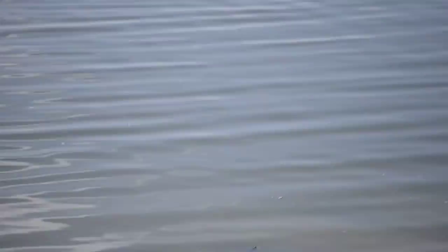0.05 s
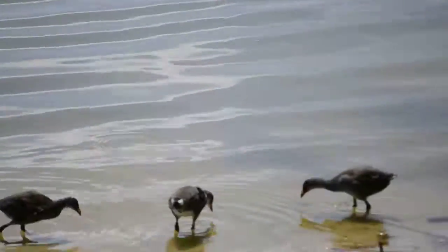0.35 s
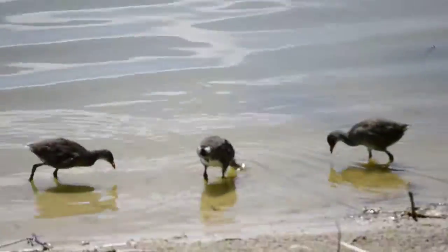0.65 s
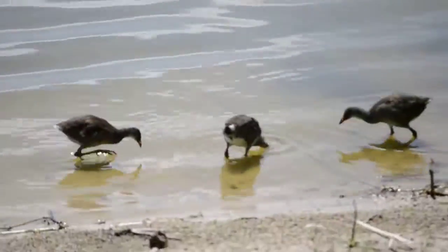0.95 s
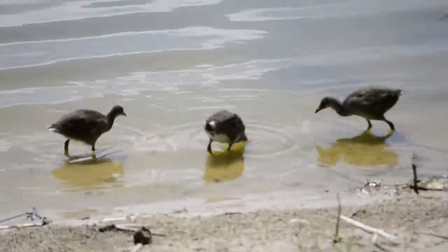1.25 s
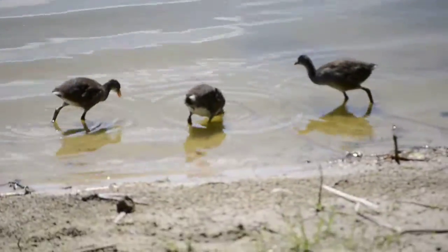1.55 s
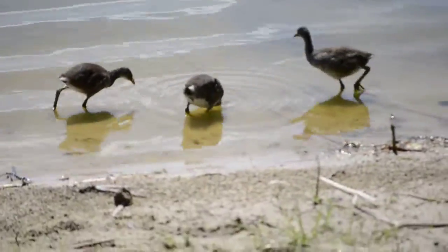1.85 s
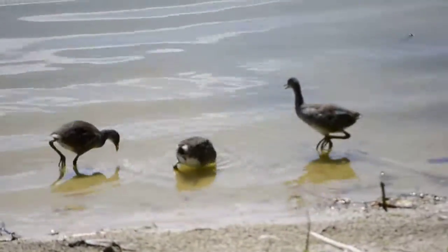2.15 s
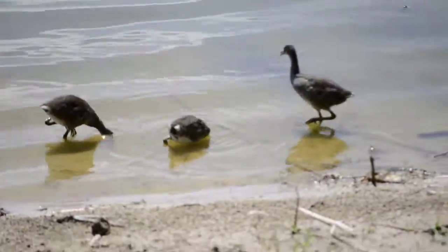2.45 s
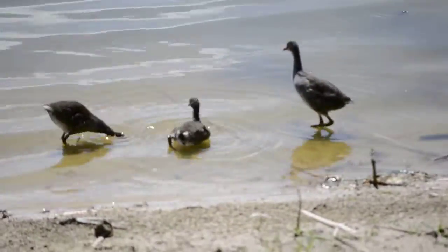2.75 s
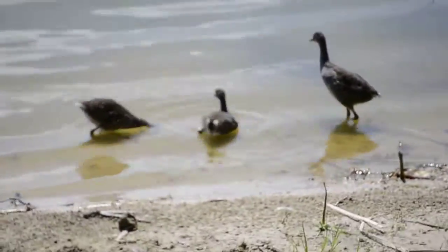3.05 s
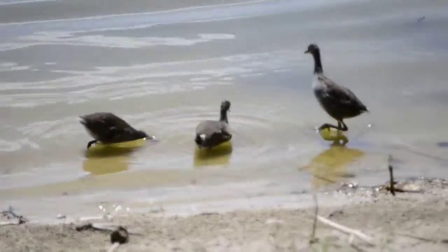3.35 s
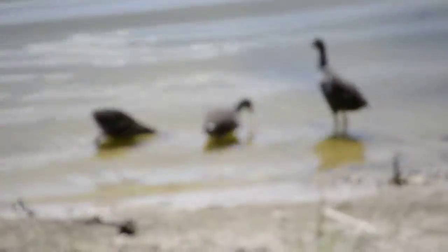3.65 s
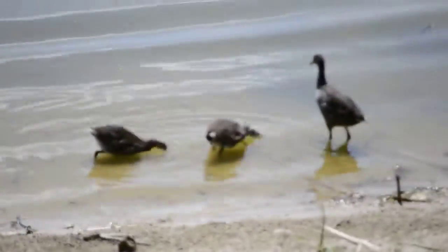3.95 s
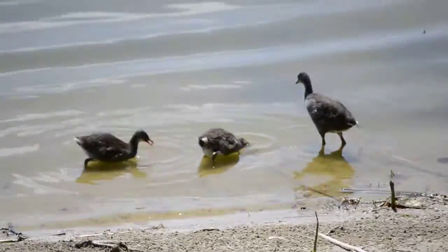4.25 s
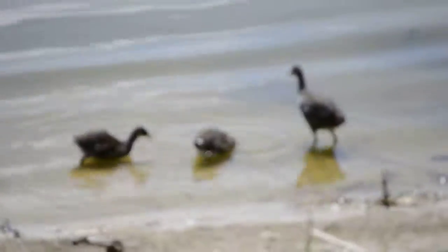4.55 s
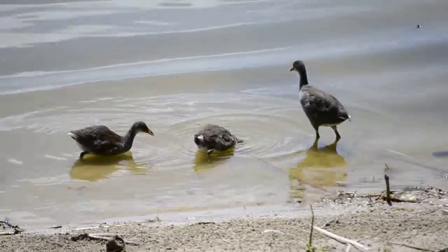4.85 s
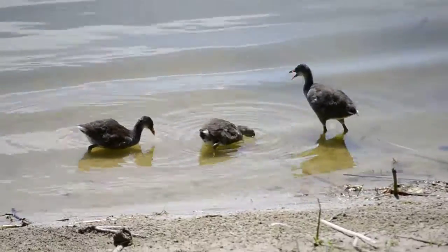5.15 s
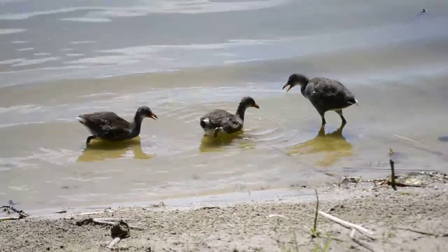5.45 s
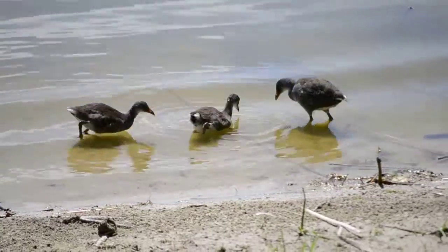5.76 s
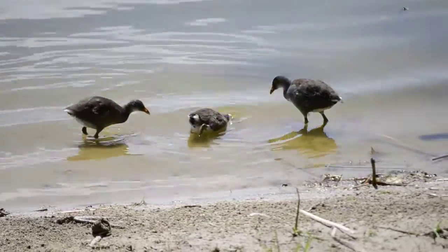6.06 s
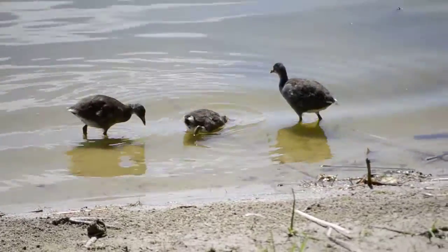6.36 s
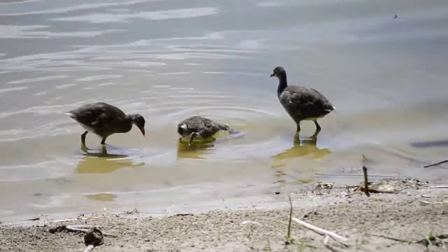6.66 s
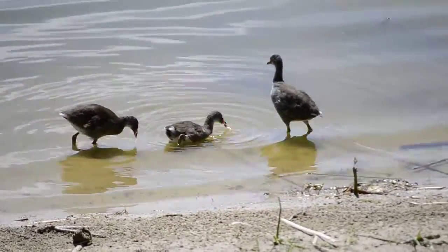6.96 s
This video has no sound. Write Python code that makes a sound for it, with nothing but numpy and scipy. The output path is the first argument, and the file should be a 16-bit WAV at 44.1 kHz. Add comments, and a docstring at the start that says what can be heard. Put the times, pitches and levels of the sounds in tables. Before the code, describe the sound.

A sharp knock and low handling rumble open on a handheld camera outdoors by a lake. Under soft airy hiss, young waterbirds peep and warble quietly, echoing a little. Then the lens motor clicks and whirrs back and forth for nearly two seconds, very close and louder than the birds. Once it stops, the birds carry on with a hoarse whistle, thin squeals and a few clearer short trills.

```python
"""Young moorhens by a handheld camera

Young moorhens chirp, whistle and trill in the shallows of a lake, over soft air and a faint insect.
A bird turns hoarse when its voice flutters or every other vibration differs; the far bank echoes it.
The camera is close to its own microphone: hands rumble and knock on the body, and the focus motor
hunts to and fro in whirring runs and quick clicking steps."""
import sys
import numpy as np
from scipy import signal
from scipy.fft import rfft, irfft
from scipy.io import wavfile

SR = 44100
rng = np.random.default_rng(int(sys.argv[2]) if len(sys.argv) > 2 else 0)


def to_wav(s):
    """Save 16-bit WAV."""
    ch = np.atleast_2d(s).T  # columns
    pcm = np.round(np.clip(ch, -1, 1) * 32767)  # PCM
    wavfile.write(sys.argv[1], SR, pcm.astype(np.int16))


N = 308259
T = np.arange(N) / SR

# tone of the rumble of the hands (frequency [Hz], level [dB])
RUMBLE_TONE = [(18, -54), (30, -23.5), (91, -4), (112, -3), (225, -5), (257, -11), (362, -18.5), (504, -35),
               (700, -50), (910, -69.5), (1540, -120)]
# the rumble dies down as the grip settles (time [s], relative level [dB])
GRIP_LEVEL = [(0, -48.5), (.11, -37.5), (.27, -44), (.35, -39), (.6, -38.5), (.68, -50), (.88, -49.5),
              (1.45, -59.5), (2.4, -59), (3.25, -59.5), (3.78, -48.5), (3.9, -59), (4.35, -62.5),
              (5.5, -59), (5.75, -63.5), (6.99, -68)]
# soft bumps of the fingers (time [s], relative level [dB])
FINGER_BUMPS = [(.215, -38), (1.165, -40.5), (1.24, -44), (1.79, -46.5), (2.15, -50), (2.295, -48),
                (2.56, -50), (2.65, -43), (2.78, -48.5), (3.03, -45.5), (3.35, -50), (3.51, -50),
                (4.16, -50), (4.438, -52), (5.57, -51)]
# tone of the open air (frequency [Hz], level [dB])
AIR_TONE = [(120, -19), (200, -10.5), (286, -0.5), (350, -1), (790, -1.5), (1190, -5.5), (1410, -5.5),
            (1530, -11), (2080, -10), (2220, -10), (2860, -9.5), (3280, -8.5), (4300, -22), (6250, -27),
            (11500, -48), (15000, -78), (22000, -120)]
# how loud the air is (time [s], relative level [dB])
AIR_LEVEL = [(0.0, -42.5), (.04, -49), (0.075, -56.5), (0.76, -59), (3.6, -56.5), (4.9, -59.5), (6.99, -59)]
# narrow bands of faint hiss (frequency [Hz], width [Hz], level [dB])
HISS_BANDS = [(4264, 233, 4.5), (5330, 240, -0.5), (6230, 270, -3.5)]
# how loud the hiss is (time [s], level [dB])
HISS_LEVEL = [(0, -47), (.08, -65), (.3, -59.5), (.6, -65), (2.5, -63), (5, -67), (6.99, -66)]
# the insect's rasps (time [s])
INSECT_TIMES = [.06, .29, .49, .68, .87, 1.11, 1.35]
# knocks on the camera (time [s], relative level [dB], dull above [Hz], thin below [Hz])
KNOCKS = [(0.2211, -14, 6960, 1200), (0.2232, -15.5, 4500, 300), (.229, -21, 4500, 450),
          (0.6894, -25.5, 1400, 200), (1.1798, -25, 2220, 130), (2.305, -29, 596, 200),
          (2.995, -39.5, 600, 200), (3.165, -32.5, 1000, 390), (3.333, -32, 900, 450),
          (3.3673, -31.5, 450, 250), (3.397, -35.5, 900, 400), (3.459, -37.5, 800, 350),
          (3.499, -39, 800, 350), (3.785, -36, 1000, 400), (4.316, -31.5, 1000, 304),
          (4.565, -39.5, 900, 400)]
# tone of the camera body (frequency [Hz], level [dB])
BODY_TONE = [(60, -12), (250, 5), (500, 4.5), (760, 3), (1000, 2.5), (1350, -4.5), (1750, -4), (2400, -3.5),
             (3000, -16), (4200, -5), (5600, -7.5), (7100, -5), (8000, -13.5), (11000, -30.5)]
# notes the camera's shell rings at (frequency [Hz], width [Hz], level [dB])
SHELL_RING = [(294, 110, 5), (759, 37, -3.5), (1180, 50, -5), (1737, 26, -5), (2435, 450, -11)]
# what a bird's throat and bill let through (frequency [Hz], level [dB])
THROAT_TONE = [(1000, -11), (1500, -20), (2000, -3.5), (3800, -4), (4600, -5.5), (6000, -6), (7300, -6.5),
               (8300, -21.5), (10000, -18), (12000, -66)]
# short peeps (time [s], top pitch [Hz], relative level [dB], half-pitch tones [dB])
PEEPS = [(.561, 3630, -53.5, -3), (.981, 3570, -49, -9), (1.267, 3690, -53, -15), (1.484, 3710, -47.5, -10),
         (1.592, 3761, -48.5, -6), (2.11, 3500, -56, -1), (2.759, 3950, -54.5, 4), (3.206, 3990, -49, -1.5),
         (4.849, 3750, -47, -8), (4.99, 3670, -51.5, -10.5), (5.431, 3850, -47, -6), (6.44, 3100, -54.5, 5)]
# longer falling cries (time [s], length [s], relative level [dB], half-pitch tones [dB])
CRIES = [(0.48, 0.084, -64, -19), (1.275, .11, -53, -11), (1.553, 0.065, -48.5, -6.5),
         (1.831, 0.084, -50.5, -0.5), (2.139, 0.083, -51.5, -1.5), (2.484, .086, -52, -3),
         (2.847, .076, -42, -10), (3.403, 0.094, -46.5, -19), (4.093, .12, -48, -7.5),
         (5.462, 0.0726, -53.5, 5.5), (6.177, 0.099, -53, 0.5), (6.87, 0.087, -52.5, 0)]
# trills that swell (time [s], length [s], warbles [per s], middle pitch [Hz],
# relative level [dB], closing pitch drop [Hz])
TRILLS = [(0.583, 0.083, 120, 3580, -58, 0), (0.701, 0.075, 79, 3670, -52.5, 0),
          (1.017, 0.11, 68, 4470, -51, 0), (1.399, .14, 77, 4026, -49, 300),
          (1.889, 0.085, 68, 3390, -48, 300), (2.317, 0.15, 54, 3930, -52, -4),
          (2.814, 0.12, 53, 3510, -47.5, 300), (5.7422, 0.08, 77, 3390, -31.5, 750),
          (6.266, .074, 73, 3420, -31, 771), (6.859, 0.177, 86, 3595, -34, 1.5)]
# small woody ticks (time [s], level [dB], pitch [Hz])
WOODY_TICKS = [(1.793, -51, 1570), (2.8596, -49, 1403), (5.2686, -46.5, 1630)]
# notes a tick rings at (multiple of its pitch, level [dB])
TICK_RING = [(1, 1.5), (1.12, -2.5), (1.47, -2.5), (2.3, -9.5)]
# longer focus runs (start [s], change of speed [s], stop [s], relative click level at the change [dB],
# relative whirr level [dB])
FOCUS_RUNS = [(2.9491, 2.9642, 3.0623, 5, -39), (3.1093, 3.1274, 3.192, 2, -40),
              (3.2483, 3.2573, 3.2633, -3, -43), (3.732, 3.7501, 3.8273, -2, -39),
              (3.8832, 3.8923, 3.9013, -3, -43), (4.2762, 4.2942, 4.3993, -20, -39),
              (4.4395, 4.4486, 4.4819, -2, -42), (4.5182, 4.5363, 4.6376, 4, -38),
              (4.6632, 4.6723, 4.7041, -5, -42)]
# quick lens steps one way (rough time [s])
STEPS_OUT = [3.282, 3.324, 3.354, 3.387, 3.421, 3.451, 3.475, 3.493, 3.517, 3.542, 3.563, 3.581, 3.602,
             3.617, 3.641, 3.659, 3.678]
# and back again (rough time [s])
STEPS_BACK = [3.925, 3.962, 3.986, 4.004, 4.025, 4.046, 4.068, 4.089, 4.122, 4.146, 4.173, 4.201]
# each series of steps (rough times [s], knock pitch [Hz], first knock's level [dB], fading [dB per s])
FOCUS_HUNTS = [(STEPS_OUT, 4030, -13.5, 14), (STEPS_BACK, 4380, -17.5, 3.2)]
# tone of the motor's whirr (frequency [Hz], level [dB])
WHIRR_TONE = [(710, -35), (1200, -9.5), (1690, -6.5), (1910, -11.5), (2280, 3.5), (2780, -8.5), (3330, 3),
              (4100, -2.5), (4600, -1), (6340, -7), (7170, -7.5), (7800, -13), (9980, -14), (10500, -21),
              (11500, -44), (15000, -50), (22000, -120)]
# notes the lens barrel rings at (frequency [Hz], width [Hz], level [dB])
BARREL_RING = [(2140, 200, 3), (2604, 87, 2), (3220, 550, -4.5), (4090, 210, -8.5), (4320, 320, -5),
               (4635, 370, -2.5), (5550, 480, -6.5), (7190, 640, -0.5), (8580, 270, -2.5), (9070, 153, -3),
               (9980, 285, -5.5)]
# course of one long whistle (time [s], pitch [Hz], relative level [dB], overtones [dB])
WHISTLE_PATH = [(5.12, 2720, -62, -12), (5.15, 3214, -53.5, -11), (5.24, 3263, -50, -7),
                (5.36, 3297, -61.5, 10), (5.44, 3193, -58.5, 1), (5.612, 3150, -56, 1)]
# where the whistle cracks (time [s], length [s], half-pitch tones [dB])
VOICE_CRACKS = [(5.116, .039, 10), (5.321, .026, 3), (5.376, .24, 4)]
# thin squeals (time [s], length [s], top pitch [Hz], relative level [dB], overtones [dB])
SQUEALS = [(5.484, 0.086, 4260, -46, -10), (5.609, .05, 3200, -58.5, 6.5), (5.8, .072, 3900, -56, -0.5),
           (6.034, 0.083, 3810, -53.5, -4)]


def undb(db):
    """Turn decibels into a number to multiply by."""
    return 10 ** (np.asarray(db) / 20)


def unit(x):
    """Scale a sound to an average power of 1."""
    return x / np.sqrt(np.mean(x ** 2))


def clock(length):
    """The time of each sample in a short sound."""
    return np.arange(max(int(length * SR), 8)) / SR


def add(out, start, x):
    """Mix x into out from a start time in seconds."""
    i = max(int(start * SR), 0)
    out[i:i + len(x)] += x[:max(N - i, 0)]


def level_curve(points):
    """Join (time, level) points with straight lines across the scene."""
    return np.interp(T, *np.transpose(points))


def gain_at(points, hz):
    """How much a tone table lets through at one frequency."""
    freqs, db = np.transpose(points)
    return undb(np.interp(np.log(hz + 1), np.log(freqs), db))


def colour(x, points, size=2048):
    """Give a sound the tone in a table."""
    cepstrum = irfft(np.log(gain_at(points, np.fft.rfftfreq(size, 1 / SR))))
    # fold it so the filter rings only after a sound, never before
    cepstrum[1:size // 2] *= 2
    cepstrum[size // 2 + 1:] = 0
    response = irfft(np.exp(rfft(cepstrum)))
    return signal.fftconvolve(x, response)[:len(x)]


def ring(x, notes):
    """Let a sound ring at several notes at once; narrow ones ring longer."""
    return sum((-1) ** k * undb(db) * signal.lfilter(*signal.iirpeak(hz, hz / width, fs=SR), x)
               for k, (hz, width, db) in enumerate(notes))


def slope(x, hz, kind, order=1):
    """Gently keep the "low" or the "high" side of a frequency."""
    return signal.sosfilt(signal.butter(order, min(hz, SR / 2 - 1), kind, fs=SR, output="sos"), x)


def wander(t, rate):
    """Random drift of about 1 either way, with `rate` new values a second."""
    count = int(t[-1] * rate) + 2
    return np.interp(t * rate, np.arange(count), rng.standard_normal(count))


def fade(t, rise, fall):
    """Fade a short sound in and out."""
    ramp = np.minimum(t / rise, (t[-1] - t) / fall)
    return np.sin(np.pi / 2 * np.clip(ramp, 0, 1)) ** 2


def with_tail(x, tail, db):
    """A sound plus a copy smeared out by a fading tail."""
    return x + undb(db) * signal.fftconvolve(x, tail / np.linalg.norm(tail))[:N]


def hands(low_hz=62, uneven_db=2.5, bump_s=.048):
    """Fingers shift on the grip: an uneven low rumble that dies down, with soft bumps."""
    noise = colour(rng.standard_normal(N), RUMBLE_TONE)
    rumble = unit(slope(noise, low_hz, "high", order=2))
    pressure = undb(level_curve(GRIP_LEVEL) - 1.5 + uneven_db * wander(T, 24))
    for start, db in FINGER_BUMPS:
        add(pressure, start, undb(db - 1) * fade(clock(bump_s), rise=.011, fall=.047))
    return rumble * pressure


def air(deep_db=-67):
    """Soft open-air noise with a deep rumble below it and a thin, faintly pitched hiss on top."""
    breeze = unit(colour(rng.standard_normal(N), AIR_TONE))
    breeze *= undb(level_curve(AIR_LEVEL) + 2.5 + .74 * wander(T, 9.4))
    hiss = unit(ring(rng.standard_normal(N), HISS_BANDS)) * undb(level_curve(HISS_LEVEL))
    low_noise = slope(rng.standard_normal(N), 150.4, "low")
    deep = unit(ring(low_noise, [(69, 65, 0)])) * undb(deep_db)
    return breeze + hiss + deep


def insect(hz=9480, width_hz=420, db=-70, rasp_s=.055):
    """An insect's wings make short high rasps, about five a second."""
    pulses, wing = np.zeros(N), [(hz, width_hz, 0)]
    for start in INSECT_TIMES:
        add(pulses, start, fade(clock(rasp_s), rise=.034, fall=.042))
    rasp = unit(ring(ring(rng.standard_normal(N), wing), wing))
    return undb(db) * pulses * rasp


def knocks(rattle_db=-13, blow_db=-3, ring_db=2, hard_db=-20, settle_db=-31, settle_s=.16):
    """Each knock jolts the camera body and rattles loose parts; soft knocks last longer."""
    out, t = np.zeros(N), clock(.08)
    for start, db, dull_hz, thin_hz in KNOCKS:
        rattle_s = .021 + .0024 * max(hard_db - db, 0)  # time to fade by 60 dB
        # as the body bends, the treble arrives first and the bass a moment later
        blow = signal.chirp(t, 11000, .0008, 1500, method="logarithmic", phi=90) * np.exp(-t / .002)
        dying_away = undb(rattle_db - 60 * t / rattle_s) + undb(settle_db - 60 * t / settle_s)
        rattle = rng.standard_normal(len(t)) * dying_away
        force = rattle + undb(blow_db) * slope(blow, 2000, "high")
        sound = colour(force, BODY_TONE) + undb(ring_db) * ring(force, SHELL_RING)
        sound = slope(slope(sound, dull_hz, "low"), thin_hz, "high", order=2)
        add(out, start, undb(db - 13) * unit(sound))
    return out


def bird_voice(t, hz, half_db, overtone_db, rasp_db, jitter, shimmer_db=3.5):
    """Every other vibration differs, adding tones at odd multiples of half the pitch."""
    hz = hz * (1 + jitter * wander(t, 501.4))
    half_phase = np.pi * np.cumsum(hz) / SR
    out = 0
    for k in range(1, 10):  # k = 2 is the main note; odd k are the half-pitch tones
        db = (k % 2) * half_db + (k > 3) * overtone_db + shimmer_db * wander(t, 110)
        db = db - (k in (5, 8, 9)) * 5 - 1.16 * max(k - 2, 0)  # higher tones are weaker
        tone_hz = k * hz / 2
        flutter = undb(rasp_db) * (wander(t, 1100) + 1j * wander(t, 1100))  # makes it hoarse
        tone = np.imag((1 + flutter) * np.exp(1j * k * half_phase))
        out = out + undb(db) * gain_at(THROAT_TONE, tone_hz) * (tone_hz < SR / 2) * tone
    return np.sqrt(2) * out


def chirp(length, top_hz, end_hz, half_db, overtone_db, swell_db,
          rise_s=.008, relax_s=.011, quick_share=.55, flick_hz=800):
    """One call: the pitch flicks up, drops quickly, then sags to the end."""
    t = clock(length)
    after_top = np.maximum(t - rise_s, 0)
    quick_drop = np.exp(-after_top / relax_s)
    slow_sag = 1 - after_top / after_top[-1]
    tension = quick_share * quick_drop + (1 - quick_share) * slow_sag
    hz = end_hz + (top_hz - end_hz) * tension - flick_hz * np.maximum(1 - t / rise_s, 0) ** 2
    loudness = undb(swell_db * (t / length - .5)) * fade(t, .013, .15 * length)
    return loudness * bird_voice(t, hz, half_db, overtone_db, rasp_db=-7.5, jitter=.013)


def chirps(peep_s=.032, peep_end_share=.63, cry_top_hz=3258, cry_end_hz=1885):
    """Short peeps that each fall by the same share, and longer cries over one pitch range."""
    out = np.zeros(N)
    for start, top_hz, db, half_db in PEEPS:
        peep = chirp(peep_s, top_hz, peep_end_share * top_hz, half_db, overtone_db=-7.5, swell_db=3)
        add(out, start, undb(db) * peep)
    for start, length, db, half_db in CRIES:
        overtone_db = -1.5 + .5 * half_db  # a hoarser cry is also brighter
        cry = chirp(length, cry_top_hz, cry_end_hz, half_db, overtone_db, swell_db=-2.5)
        add(out, start, undb(db) * cry)
    return out


def shore_echo(x, fade_s=.75, echo_db=-11):
    """The far bank and its trees scatter a thin echo back."""
    t = clock(.7)
    tail = rng.standard_normal(len(t)) * undb(-60 * t / fade_s) * (1 - np.exp(-t / .0163))
    return with_tail(x, tail, echo_db)


def trills(swell_db=13, closing_s=.022, swing_hz=600, top_dip_db=12):
    """Fast warbles, loudest at the bottom of each swing; some settle on a low closing note."""
    out = np.zeros(N)
    for start, length, rate, middle_hz, db, drop_hz in TRILLS:
        t = clock(length)
        swing = np.cos(2 * np.pi * rate * t + .27 * wander(t, 48.7))
        closing_hz = np.clip((t - length + closing_s) / .00848, 0, 1) * drop_hz
        hz = middle_hz - closing_hz + np.maximum(swing_hz - .71 * closing_hz, 0) * swing
        effort_db = db + 3 - swell_db * np.maximum(1 - t / (.55 * length), 0)
        effort_db -= top_dip_db * np.sqrt((swing + 1) / 2)
        overtone_db = -15.5 - .5 * (db + 31.5)  # the loud trills are the purest
        voice = bird_voice(t, hz, half_db=-31.5, overtone_db=overtone_db, rasp_db=-17, jitter=.019)
        add(out, start, undb(effort_db) * fade(t, .0018, .017) * voice)
    return out


def woody_ticks(width_hz=110):
    """Small hollow ticks: a burst of noise with a very short ring."""
    out, t = np.zeros(N), clock(.03)
    for start, db, hz in WOODY_TICKS:
        force = rng.standard_normal(len(t)) * np.exp(-t / .0024)
        notes = [(hz * multiple, width_hz, note_db) for multiple, note_db in TICK_RING]
        add(out, start, undb(db) * unit(ring(force, notes)))
    return out


def jolt(length, from_hz, to_hz):
    """A jerk of the motor: a short vibration that slides down in pitch."""
    t = clock(length)
    return fade(t, .00016, .00031) * signal.chirp(t, from_hz, t[-1], to_hz)


def lens_steps(beat_s=.003023, first_beat_s=3.2815, long_gap_s=.026):
    """Steps keep to the motor's beat and last two beats, or three before a long gap."""
    for times, hz, db, fading in FOCUS_HUNTS:
        for time, gap in zip(times, np.diff(times, append=times[-1])):
            start = first_beat_s + beat_s * np.round((time - first_beat_s) / beat_s)
            length = beat_s * (2 + (gap > long_gap_s))
            yield start, length, hz, db - fading * (time - times[0])


def focus_motor(start_db=-22, stop_db=-19, run_db=-17, full_whirr_db=-39, step_whirr_db=-43,
                surge_db=7, surge_s=.041, shiver_s=.016):
    """The motor clicks on, whirrs and clicks off; in quick steps the slightly loose lens knocks too."""
    blows, drive = np.zeros(N), np.zeros(N)
    click = jolt(.0015, from_hz=12500, to_hz=1600)
    for start, length, hz, db in lens_steps():
        pitch, size, slip = rng.standard_normal(3)  # the lens never sits quite the same
        hz = hz * (1 + .035 * pitch)
        knock = undb(db + .67 * size) * jolt(.00229, 1.278 * hz, .73 * hz)
        add(blows, start, undb(start_db) * click)
        add(blows, start + .00032 + .00003 * slip, knock)
        add(blows, start + length, undb(stop_db + .5 * rng.standard_normal()) * click)
        add(drive, start, undb(step_whirr_db) * fade(clock(length + .014), .00038, .011))
    for start, change, stop, change_db, db in FOCUS_RUNS:
        add(blows, start, undb(run_db + .5 * (db - full_whirr_db)) * click)  # gentle run, gentle click
        add(blows, change, undb(run_db - 1.5 + change_db) * click)
        add(blows, stop, undb(stop_db - 1.5) * click)
        t = clock(stop - start + .0023)
        effort_db = db - 6.5 + surge_db * np.exp(-t / surge_s)  # it works hardest while speeding up
        add(drive, start, undb(effort_db) * fade(t, .00078, .0022))
    # the many small parts of the lens shiver the same way after every blow
    t = clock(.04)
    shiver = rng.standard_normal(len(t)) * undb(-60 * t / shiver_s)
    blows = with_tail(blows, shiver, db=-8)
    whirr = unit(colour(rng.standard_normal(N), WHIRR_TONE)) * undb(3.65 * wander(T, 400))
    return ring(blows, BARREL_RING) + drive * whirr


def whistle(clear_half_db=-28, clear_rasp_db=-24, cracked_rasp_db=-5):
    """A held clear note that turns hoarse wherever it cracks to the half pitch."""
    times, *columns = np.transpose(WHISTLE_PATH)
    out, t = np.zeros(N), clock(times[-1] - times[0])
    hz, db, overtone_db = (np.interp(t + times[0], times, column) for column in columns)
    half_db, rasp_db = clear_half_db, clear_rasp_db
    for start, length, crack_db in VOICE_CRACKS:
        since = t + times[0] - start
        cracked = np.clip(np.minimum(since, length - since) / .0047, 0, 1)
        half_db = half_db + cracked * (crack_db - clear_half_db)
        rasp_db = rasp_db + cracked * (cracked_rasp_db - clear_rasp_db)
    voice = bird_voice(t, hz, half_db, overtone_db, rasp_db, jitter=.0042)
    add(out, times[0], undb(db) * fade(t, .0066, .008) * voice)
    return out


def squeals(end_share=.76, half_db=-17, rasp_db=-6, brighten_db=8):
    """A bird's voice slides evenly down and grows brighter as it falls."""
    out = np.zeros(N)
    for start, length, top_hz, db, overtone_db in SQUEALS:
        t = clock(length)
        progress = t / t[-1]
        hz = top_hz * (1 - (1 - end_share) * progress)
        bright_db = overtone_db + brighten_db * (progress - .5)
        voice = bird_voice(t, hz, half_db, bright_db, rasp_db, jitter=.004)
        add(out, start, undb(db) * fade(t, .0076, .013) * voice)
    return out


def scene():
    """Birds echo across the lake; the camera's noises are right at the microphone."""
    birds = shore_echo(chirps() + squeals() + whistle() + trills())
    return (birds + focus_motor() + knocks() + woody_ticks() + hands() + air() + insect())[None]


def record(dry):
    """The camera rounds off the loudest peaks and cuts the treble above 11000 Hz."""
    rounded = .8 * np.tanh(dry / .8)
    return signal.sosfilt(signal.ellip(6, .3, 70, 11000, fs=SR, output="sos"), rounded)


dry = scene()
out = record(dry)
to_wav(out)
```